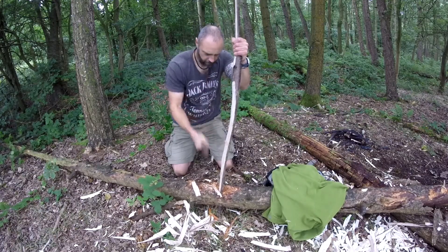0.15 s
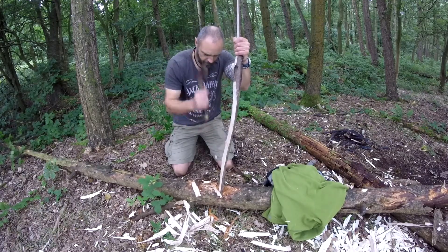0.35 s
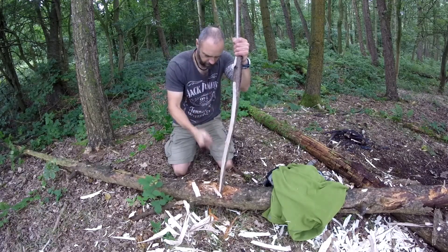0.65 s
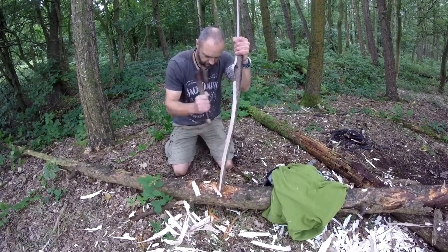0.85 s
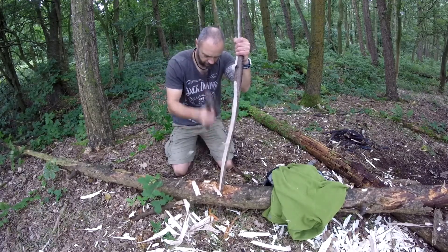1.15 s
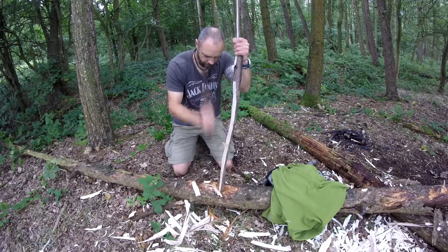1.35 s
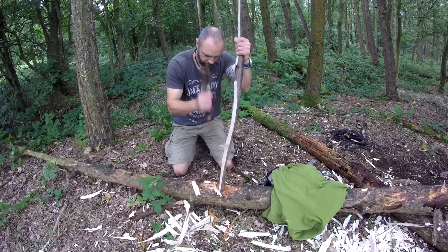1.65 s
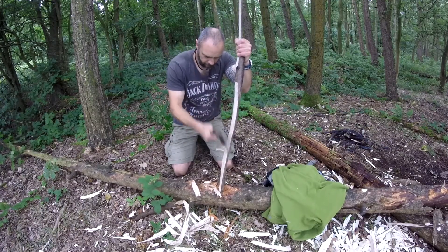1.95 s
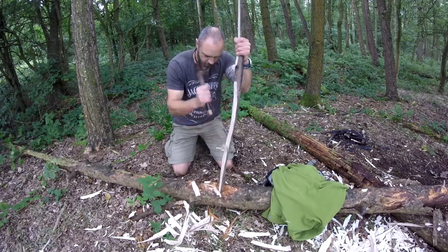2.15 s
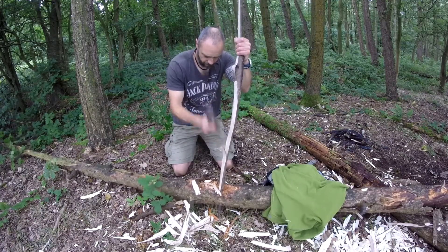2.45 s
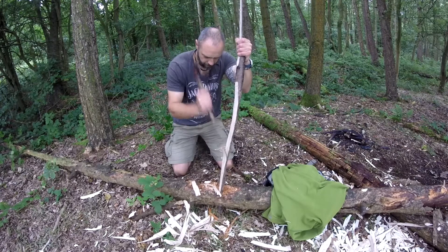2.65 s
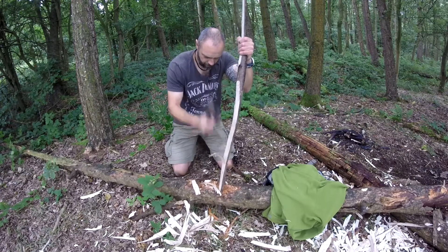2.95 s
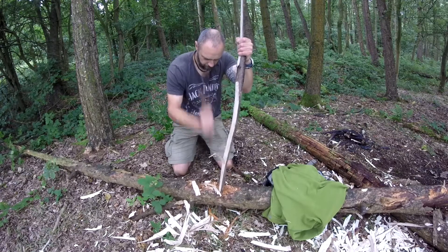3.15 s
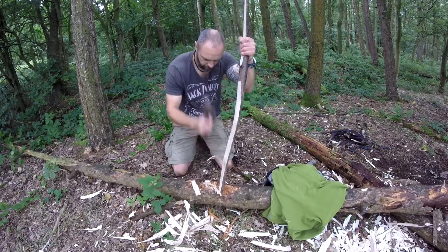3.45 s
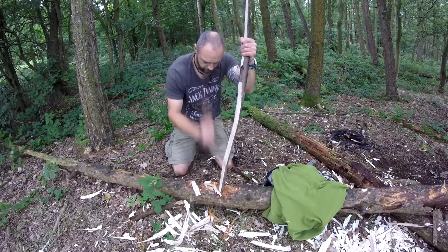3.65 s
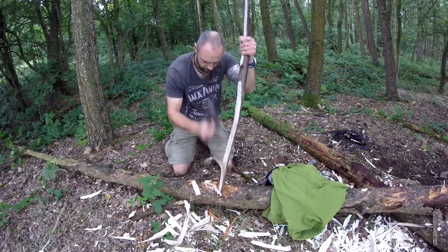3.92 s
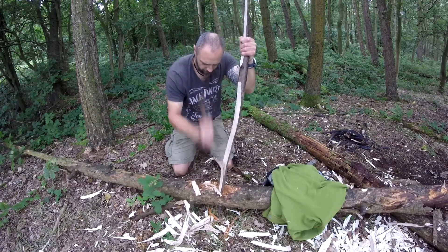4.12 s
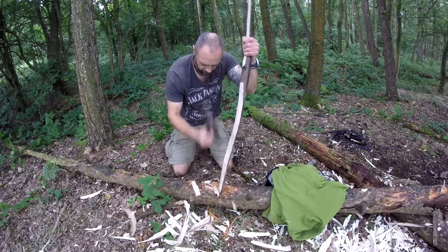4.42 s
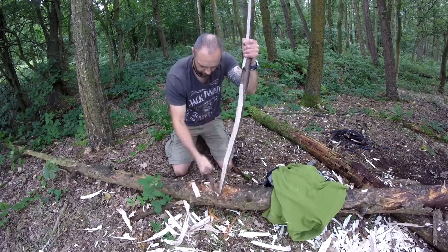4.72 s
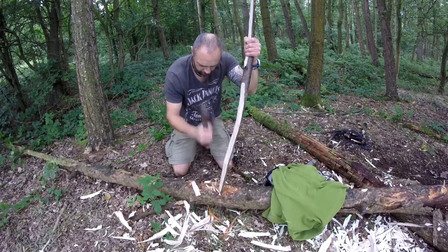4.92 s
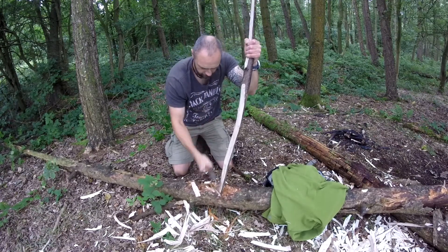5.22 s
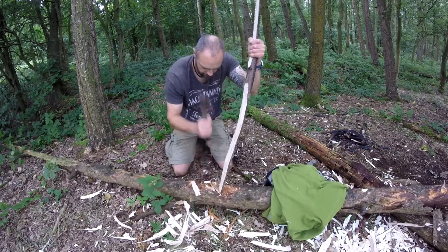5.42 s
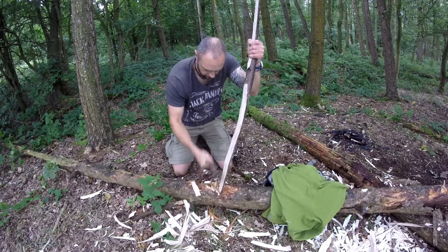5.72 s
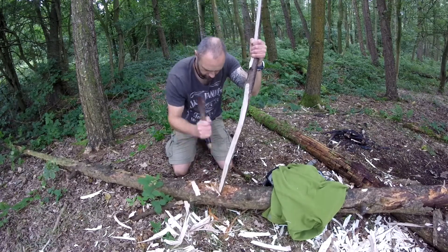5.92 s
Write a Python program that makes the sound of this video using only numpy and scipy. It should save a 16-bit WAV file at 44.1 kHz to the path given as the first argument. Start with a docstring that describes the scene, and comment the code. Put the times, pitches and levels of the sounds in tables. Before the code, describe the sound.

A hatchet hews a wooden stave close to the microphone in woodland, about two strokes a second. Each stroke is a sharp, splintering crack with a faint steel ping and a thud as the stave hits the log beneath. A loose piece of wood clacks near the start. Later the thuds land harder and chips tick into dry leaves. A low rumble and a far road-like roar continue underneath.

```python
"""A hatchet bites into wood, close by among trees: a kneeling man hews a long stave, two strokes a second.
Each bite tears fibres, rings the stave and the steel head, and drives the stave onto the log under it.
The microphone faces one side of the stave; the trunks scatter back the cracks from all sides.
Chips tick into dry leaves, and a low rumble and a far roar, as of a distant road, lie under the work."""
import sys
import numpy as np
from scipy import signal
from scipy.fft import rfft, irfft
from scipy.io import wavfile

SR = 44100
rng = np.random.default_rng(int(sys.argv[2]) if len(sys.argv) > 2 else 0)


def dump(signal):
    """Clip the signal to [-1, 1] and save it as 16-bit WAV at the path in sys.argv[1]."""
    limited = np.clip(np.atleast_2d(signal).T, -1, 1)
    pcm = np.round(limited * 32767).astype(np.int16)
    wavfile.write(sys.argv[1], SR, pcm)


N = 268128


def amp(db):
    """Decibels to gain."""
    return 10 ** (np.asarray(db) / 20)


def unit_rms(x):
    """Scales to rms 1."""
    return x / np.sqrt(np.mean(x ** 2) + 1e-20)


def unit_peak(x):
    """Scales to peak 1."""
    return x / abs(x).max()


def curve_at(points, hz):
    """Reads a table on a log-frequency axis."""
    f, value = np.transpose(points)
    return np.interp(np.log(hz + 1), np.log(f + 1), value)


def add(mix, s, sound):
    """Mixes a sound in at time s."""
    part = mix[round(s * SR):][:len(sound)]
    part += sound[:len(part)]


def coloured(x, points, size=4096):
    """Minimum-phase filter shaped by rows of f/Hz, level/dB."""
    log_gain = np.log(amp(curve_at(points, abs(np.fft.fftfreq(size, 1 / SR)))))
    taps = np.fft.ifft(np.exp(np.conj(signal.hilbert(log_gain)))).real
    return signal.fftconvolve(x, taps[:size // 2])[:len(x)]


def ring(modes, t, pitch=1, spread_db=0):
    """Dying modes; where the blow lands, left to chance, decides how strongly each one answers."""
    offsets_db = spread_db * rng.standard_normal(len(modes))
    return sum(amp(db + offset - 60 * t / t60) * np.cos(2 * np.pi * hz * pitch * t)
               for (hz, db, t60), offset in zip(modes, offsets_db))


def crackle(t, decay_s, per_s):
    """Random snaps of fibres or leaves, ever weaker; energy 1."""
    snaps = rng.standard_normal(len(t)) * (rng.random(len(t)) < per_s / SR)
    snaps *= np.exp(-(t / decay_s) ** 0.98)
    return snaps / (np.linalg.norm(snaps) + 1e-9)


def wavering_noise(spectrum, waver_db):
    """Coloured noise whose level wanders a little; rms 1."""
    t = np.arange(N) / SR
    gain = amp(curve_at(spectrum, np.fft.rfftfreq(N, 1 / SR)))
    noise = irfft(rfft(rng.standard_normal(N)) * gain, N)
    wander = unit_rms(sum(np.sin(2 * np.pi * (hz * t + rng.random())) for hz in np.geomspace(.7, 9, 12)))
    return unit_rms(noise * amp(waver_db * wander))


# spectra of the low rumble and the far roar: f/Hz, relative level/dB
RUMBLE_SPECTRUM = [(8.8, -25), (15, -7), (38, -3), (54, -1), (68, -2.5), (87, -8), (135, -14), (156, -15),
                   (300, -18.5), (390, -55), (660, -120)]
ROAR_SPECTRUM = [(150, -40), (250, -22.5), (342, -6.5), (386, -7.5), (414, -6.5), (460, -6), (528, -4),
                 (802, -1), (1220, -16), (1580, -20), (1730, -19.5), (2090, -21.5), (2620, -31),
                 (14400, -52.5), (16000, -65)]
# slow swell of the roar: t/s, level/dB
ROAR_SWELL = [(0, 0.9), (1, -1.5), (2, -1.5), (3, -0.6), (4, -.6), (6.08, 1.5)]

def background(rumble_db=-39.5, roar_db=-41):
    """The bed of the place: a low rumble and, far off, a roar as of a road."""
    swell_db = np.interp(np.arange(N) / SR, *np.transpose(ROAR_SWELL))
    rumble = amp(rumble_db) * wavering_noise(RUMBLE_SPECTRUM, waver_db=1.14)
    roar = amp(roar_db + swell_db) * wavering_noise(ROAR_SPECTRUM, waver_db=0.32)
    return rumble + roar


# decay among the nearer trees: f/Hz, t60/s
FOREST_T60 = [(200, 0.053), (1000, 0.22), (2000, 0.31), (4000, 0.33), (9000, 0.31), (15000, 0.22)]
# colour of their echo at the microphone: f/Hz, level/dB
FOREST_COLOUR = [(150, -12), (500, -9), (1300, -12), (2000, -13.5), (3500, -9.5), (7000, -4), (14000, 1)]

def forest_echo(x, rise_s=0.016, far_db=-23.0, far_t60_s=1.0):
    """Echoes from trunks and leaves build up slowly and favour the treble; faint far ones linger."""
    t = np.arange(SR * 3 // 4) / SR
    echoes = rng.standard_normal(len(t)) * (rng.random(len(t)) < 5000 / SR)
    echoes *= 1 - np.exp(-(t / rise_s) ** 2)
    hz, age_s, spectra = signal.stft(echoes, SR, nperseg=256)
    decay = amp(-60 * age_s / curve_at(FOREST_T60, hz)[:, None]) + amp(far_db - 60 * age_s / far_t60_s)
    tail = signal.istft(spectra * decay, SR, nperseg=256)[1]
    return signal.fftconvolve(x, coloured(tail / np.linalg.norm(tail), FOREST_COLOUR))[:len(x)]


# knock of a loose piece of wood: t/s, peak level/dB
CLACKS = [(0.3503, -19)]
# modes of that piece: f/Hz, level/dB, t60/s
PIECE_MODES = [(783, -4.5, 0.062), (1056, -4, 0.083), (1120, 2, 0.039), (1580, 0.5, 0.044),
               (1830, -4, 0.027), (2120, -0.5, 0.018), (2900, -9, 0.013)]
# larger chips landing on the forest floor: t/s, peak level/dB, scatter time/s
CHIP_FALLS = [(.3, -36, .0014), (4.574, -43.5, 0.0089), (5.1126, -50, .003), (5.411, -45, 0.0028),
              (5.861, -54, .0016)]
# colour of the dry leaves: f/Hz, level/dB
LEAF_COLOUR = [(500, -30), (1500, -4), (3000, 4), (6500, 0), (10000, -17), (15000, -24)]

def chips(echo_db=-7, flight_s=(.2, .4), crumb_db=-54, crumb_scatter_s=.005):
    """Around the work a loose piece clacks; chips, and a crumb from each cut, tick in the leaf litter."""
    direct, t = np.zeros(N), np.arange(SR // 5) / SR
    attack = 1 - np.exp(-t / 0.00073)
    for s, db in CLACKS:
        add(direct, s, amp(db) * unit_peak(ring(PIECE_MODES, t) * attack))
    crumbs = [(s + rng.uniform(*flight_s), crumb_db, crumb_scatter_s) for s, *_ in CUTS]
    for s, db, scatter_s in CHIP_FALLS + crumbs:
        tick = coloured(crackle(t, scatter_s, per_s=3600), LEAF_COLOUR)
        add(direct, s, amp(db) * unit_peak(tick))
    return direct + amp(echo_db) * forest_echo(direct)


# bending modes of the stave: f/Hz, level/dB, t60/s
STAVE_MODES = [(281.3, -12, 0.086), (310, -16.5, 0.053), (466, -8.5, 0.051), (695, -39, 0.042),
               (798, -4.5, 0.032), (980, -24, 0.013), (1352, 4.5, 0.036), (1572, -11, 0.048),
               (1715, -0.5, 0.023), (2030, -2.5, 0.012), (2029, 1, 0.02), (2450, -19.5, 0.064),
               (2920, 1.5, 0.01), (3230, -0.5, 0.0089), (3520, 12, 0.0068), (4030, 11.5, 0.0087),
               (4350, 2.5, 0.0066), (5120, 2.5, 0.019), (6430, -7, 0.019)]
# colour of snapping fibres: f/Hz, level/dB
SNAP_COLOUR = [(40, -1.5), (130, -15), (260, -5), (800, -3.5), (1300, -5.5), (2000, 6), (4500, 0.5),
               (6500, -4.5), (8000, -18), (11000, -27.5), (15000, -35)]
# edges of the five bands of a bite (body, knock, crack, splinter, fizz): f/Hz
BAND_EDGES = [150, 1100, 2700, 4500, 7000, 15000]

def bite(tear_s, levels_db, pitch, stave_ring=0.048, size=4096):
    """The wood gives with a click and tears on; the stave rings with every snap."""
    t, hz = np.arange(size) / SR, np.fft.rfftfreq(size, 1 / SR)
    force = crackle(t, tear_s, per_s=18000)
    force[0] += .3  # the opening click
    ringing = signal.fftconvolve(force, ring(STAVE_MODES, t, pitch, spread_db=0.5))[:size]
    wood = coloured(force + stave_ring * ringing, SNAP_COLOUR)
    # depth and angle of the cut set each band's energy, given as a level over 20 ms
    power = 2 * abs(rfft(wood)) ** 2 / size / (.02 * SR)
    shape = []
    for lo, hi, db in zip(BAND_EDGES, BAND_EDGES[1:], levels_db):
        lift_db = db - 10 * np.log10(power[(hz >= lo) & (hz < hi)].sum())
        shape += [(lo * 1.2, lift_db), (hi / 1.2, lift_db)]
    return coloured(wood, shape)


# modes of the log on the ground: f/Hz, level/dB, t60/s
LOG_MODES = [(108, -33, 0.37), (166.4, -18, 0.11), (248, -12, 0.075), (315, -11, 0.043), (488, -9, 0.037),
             (574, -18, 0.065), (775, -37, 0.018)]
# the stave's foot bruising the log, per band: level/dB against the thud's peak
CRUNCH_BANDS = [-26, -34, -44.5, -45, -49]
THUD_LEAD_S = .004  # the push starts this long before its centre

def landing(peak_db, log_ring, half_contact_ms=0.46, hardening=0.082, rebound=0.46):
    """The stave lands: a push and its rebound ring the log, with a small crunch of fibres."""
    t = np.arange(SR // 6) / SR
    width_s = half_contact_ms / 1000 * amp(peak_db) ** -hardening  # softer landings last longer
    u = (t - THUD_LEAD_S) / width_s
    push = (u + rebound * (u ** 2 - 1)) * np.exp(-u ** 2 / 2)
    ringing = signal.fftconvolve(push, ring(LOG_MODES, t))[:len(t)]
    thud = unit_peak(push + log_ring * ringing)
    add(thud, THUD_LEAD_S / 2, bite(tear_s=0.0027, levels_db=CRUNCH_BANDS, pitch=.95))
    return amp(peak_db) * thud


# modes of the hatchet head: f/Hz, level/dB, t60/s
STEEL_MODES = [(3300, -2, .12), (3980, 0, .1), (5428, -2, .21), (6430, -2, .12), (6580, -5, .08),
               (8735, -11, .035), (9360, -5, .065), (9480, -6, .055)]

def steel_ping(favoured_hz, db_per_octave=22):
    """The head pings; heel, middle or toe of the edge favour different modes."""
    t = np.arange(SR // 3) / SR
    modes = [(hz, db - db_per_octave * abs(np.log2(hz / favoured_hz)), t60) for hz, db, t60 in STEEL_MODES]
    ping = ring(modes, t) * (1 - np.exp(-t / 0.0021))
    return ping * np.sqrt(.02 * SR) / np.linalg.norm(ping)  # the energy of 20 ms at rms 1


# colour of a skid, per band: level/dB
SKID_BANDS = [6.5, 4, 1.5, 4.5, 0.5]

def skid(length_s, db):
    """The blade skids along the stave in a short, bright scrape."""
    return bite(length_s, db + np.array(SKID_BANDS), pitch=1.08)


# colour of a cut, per band: level/dB
CUT_BANDS = [-0.5, -1.5, -9, -13.3, -19.5]
# how far each band follows the crispness of the split and the hiss of the edge: share/(dB per dB)
CRISP_SHARE = [0, 0.78, 1.38, 0.98, 0.31]
HISS_SHARE = [0, 0.16, 0, 0.37, 0.85]

def cut(tear_s, strength_db, crisp_db, hiss_db, pitch):
    """The edge splits the wood: a clean split is crisper than a dull chop, and a glancing one hisses."""
    colour_db = np.array(CUT_BANDS) + crisp_db * np.array(CRISP_SHARE) + hiss_db * np.array(HISS_SHARE)
    return bite(tear_s, strength_db + colour_db, pitch)


# the blade bites: t/s, tearing time/s, strength/dB, crispness/dB, hiss/dB, factor on the stave's pitch,
# head ping level/dB, favoured f/Hz, thin edge level/dB
CUTS = [(0.171, 0.0071, -23, -1.5, 8.5, 1.005, -45, 3900, -53),
        (0.1899, 0.0077, -26.5, -14.5, -2, 0.95, -65, 3900, -65),
        (0.6687, 0.011, -25.5, -1, 1.5, .98, -42, 4270, -55),
        (1.1208, 0.0046, -23, 5, -3, 0.97, -38, 3600, -59),
        (1.5428, 0.0055, -25, -1.5, 6, 1.01, -62, 4000, -64),
        (1.9775, 0.0057, -23, -3, -.3, 0.92, -52, 5500, -65),
        (2.4308, 0.0053, -25, 4.5, 0.5, 0.99, -48, 6400, -60),
        (2.895, 0.004, -24, 6, 1.5, 0.96, -35.5, 3300, -52),
        (3.363, 0.0072, -26, -3, 1, 0.89, -50, 6500, -55),
        (3.851, 0.0045, -26, 5.5, 2.5, .99, -47, 3300, -48),
        (4.3306, 0.0028, -25.5, -7.5, 5, 0.98, -54, 5510, -48),
        (4.8069, 0.0051, -24, 0.8, -4, 0.94, -48, 4500, -53),
        (5.2763, 0.007, -27, 0, 1.5, 1.06, -45, 5430, -49.5),
        (5.7521, 0.0054, -22, -2, -1.5, 0.98, -43, 3900, -48.5)]
# the blade skids: t/s, length/s, level/dB
SKIDS = [(4.322, 0.025, -43), (4.3467, 0.0033, -43.5), (4.8108, 0.007, -43), (4.8342, 0.0036, -40.5),
         (5.768, 0.0049, -49.5)]
# the stave is driven onto the log: t/s, peak level/dB, gain of the log's ring
LANDINGS = [(0.1941, -24, .035), (0.6772, -16, 0.022), (1.128, -12, 0.057), (1.5521, -19.5, 0.024),
            (1.9903, -14.5, 0.099), (2.4398, -12.5, .1), (2.902, -15, 0.034), (3.3706, -19, 0.031),
            (3.8574, -18.5, .022), (4.3533, -2, .075), (4.8445, -20, .04), (5.3118, -8.5, 0.037),
            (5.781, -4.5, 0.044)]

def hewing(cut_echo_db=-5, skid_echo_db=-10, thud_echo_db=-8, ping_echo_db=-8, edge_hz=9400, n_sides=3):
    """The hatchet work near the microphone; each side of the stave sends its own crack into the trees."""
    direct, sides = np.zeros(N), np.zeros((n_sides, N))

    def emit(s, sounds, echo_db):
        """One sound for each side of the stave; the first side faces the microphone."""
        add(direct, s, sounds[0])
        for side, sound in zip(sides, sounds):
            add(side, s, amp(echo_db) * sound)

    for s, tear_s, strength_db, crisp_db, hiss_db, pitch, ping_db, favoured_hz, edge_db in CUTS:
        emit(s, [cut(tear_s, strength_db, crisp_db, hiss_db, pitch) for _ in sides], cut_echo_db)
        steel = amp(ping_db) * steel_ping(favoured_hz) + amp(edge_db) * steel_ping(edge_hz)
        emit(s, [steel] * n_sides, ping_echo_db)
    for s, length_s, db in SKIDS:
        emit(s, [skid(length_s, db) for _ in sides], skid_echo_db)
    for s, db, log_ring in LANDINGS:
        emit(s - THUD_LEAD_S, [landing(db, log_ring)] * n_sides, thud_echo_db)
    return direct + sum(forest_echo(side) for side in sides) / np.sqrt(n_sides)


def scene():
    """One microphone among the trees: rumble and far roar behind, hewing and chips in front."""
    return (background() + hewing() + chips())[None]


def record(dry, ceiling=.9, cutoff_hz=15300):
    """The recorder rounds the very highest peaks and cuts off the top of the treble."""
    rounded = dry / (1 + (dry / ceiling) ** 8) ** (1 / 8)
    lowpass = signal.firwin(255, cutoff_hz, window=("kaiser", 8), fs=SR)
    return signal.oaconvolve(rounded, lowpass[None], "same")


dry = scene()
out = record(dry)
dump(out)
```